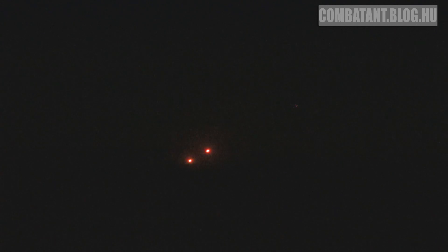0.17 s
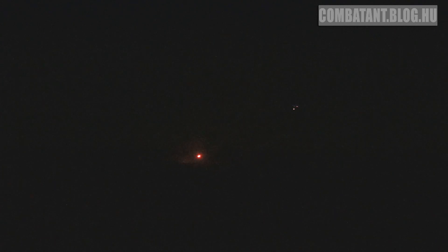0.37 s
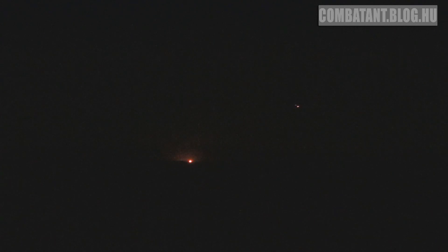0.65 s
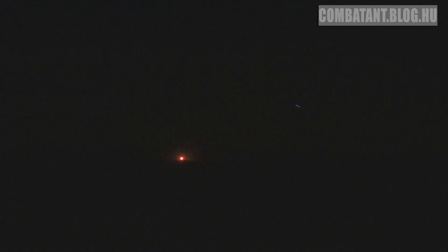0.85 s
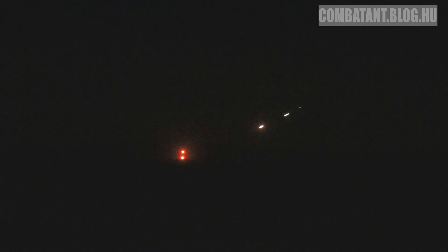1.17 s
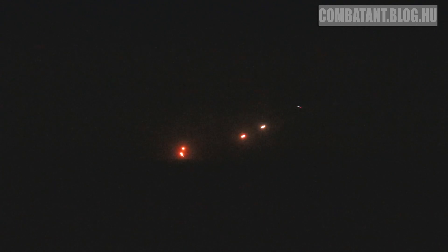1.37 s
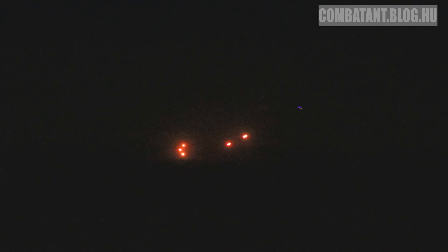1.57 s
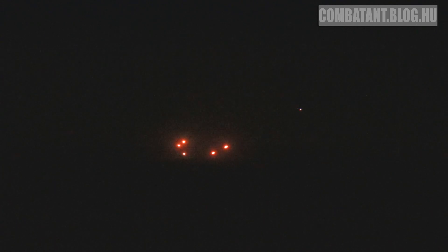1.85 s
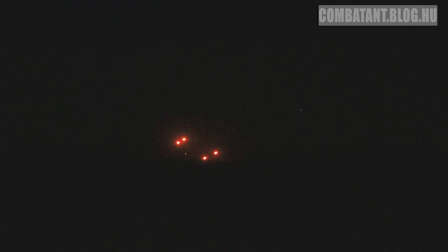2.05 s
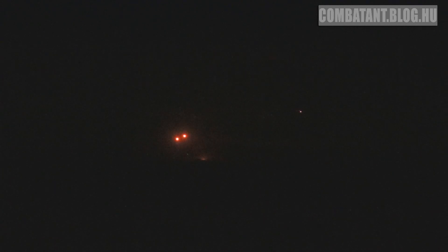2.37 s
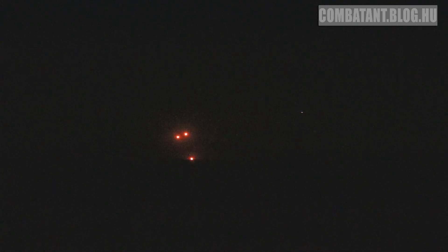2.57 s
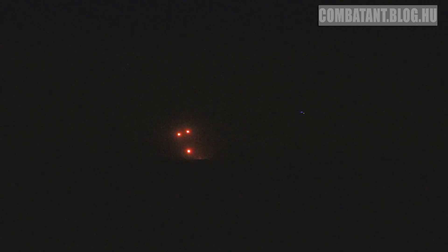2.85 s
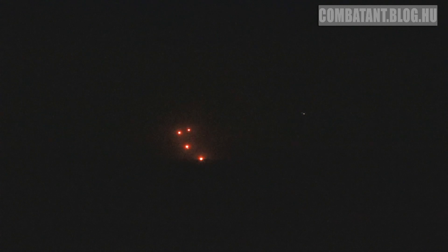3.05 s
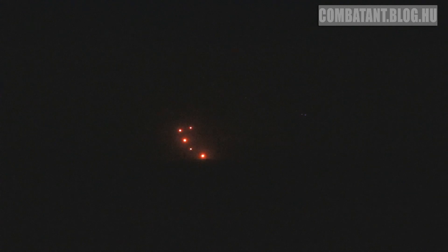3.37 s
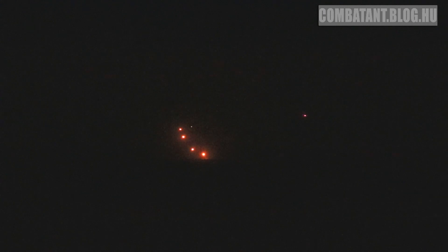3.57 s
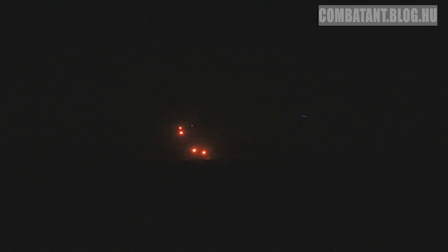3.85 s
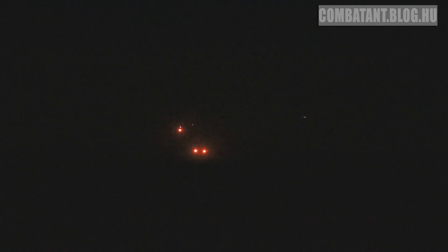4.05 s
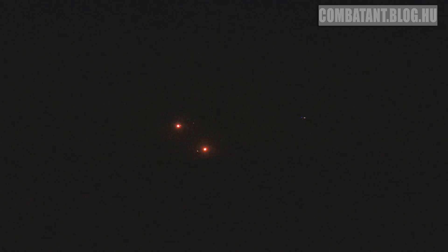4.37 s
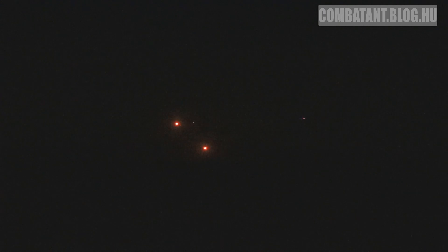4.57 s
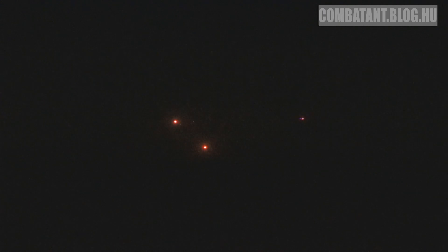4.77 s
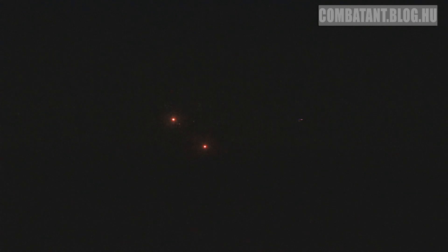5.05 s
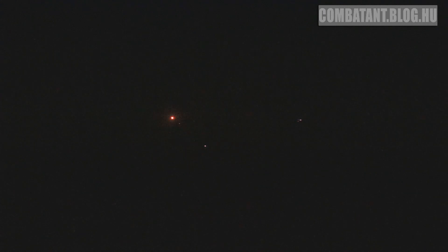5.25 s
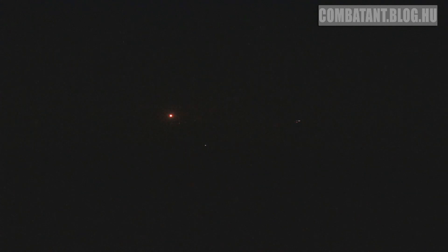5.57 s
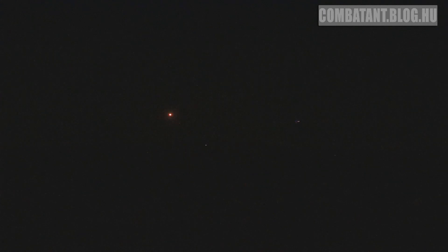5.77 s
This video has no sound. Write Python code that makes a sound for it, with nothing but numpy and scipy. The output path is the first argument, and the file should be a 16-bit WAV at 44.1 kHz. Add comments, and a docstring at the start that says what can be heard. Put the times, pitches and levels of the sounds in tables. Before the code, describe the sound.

Far-off automatic gunfire, dull, hard-edged single bangs with low thumps and murky echoes, over a quiet night rumble and microphone hiss.

```python
"""Distant cannon at night

An automatic cannon fires twelve rounds far away over open ground at night.
Each bang is a sharp front along several paths, a ringing body, a late low thump and a noisy spray.
The terrain answers with dull echoes, made by convolving each bang with shaped noise.
Under it lie a low night rumble and faint wavering tones, both made from noise, and microphone hiss."""
import sys
import numpy as np
from scipy import signal
from scipy.fft import rfft, irfft, next_fast_len
from scipy.io import wavfile

SR = 44100
rng = np.random.default_rng(int(sys.argv[2]) if len(sys.argv) > 2 else 0)


def transcribe(u):
    """Save the signal u as a 16-bit wav file named by the first command-line argument.

    u: samples, shape (n,) or (channels, n), limited to [-1, 1]; the rate is SR.
    q: integer samples, one column per channel.
    """
    v = np.clip(np.atleast_2d(u).T, -1, 1)
    q = np.round(v * 32767).astype(np.int16)
    wavfile.write(sys.argv[1], SR, q)


N = 260542  # length in samples


def from_db(db):
    """Turn decibels into a factor for the sound pressure."""
    return 10 ** (np.asarray(db) / 20)


def rms_one(x):
    """Scale to an rms (average strength) of 1."""
    return x / np.sqrt(np.mean(x ** 2) + 1e-20)


def low_pass(x, hz, order=2):
    """Weaken what lies above a frequency (Butterworth filter)."""
    sos = signal.butter(order, min(hz, 0.45 * SR), fs=SR, output="sos")
    return signal.sosfilt(sos, x + 1e-18)


def high_pass(x, hz, order=2):
    """Weaken what lies below a frequency (Butterworth filter)."""
    sos = signal.butter(order, hz, "high", fs=SR, output="sos")
    return signal.sosfilt(sos, x + 1e-18)


def colour(x, spectrum):
    """Raise or lower each frequency by a table of f/Hz, level/dB, joined up along log frequency."""
    hz, db = np.transpose(spectrum)
    size = next_fast_len(x.shape[-1])
    bins = np.maximum(np.fft.rfftfreq(size, 1 / SR), 1)
    gain = from_db(np.interp(np.log(bins), np.log(hz), db))
    return irfft(rfft(x, size) * gain, size)[..., :x.shape[-1]]


def stereo_noise(size, side_db):
    """White noise, nearly alike at two close microphones: a shared part and a weaker opposed part."""
    mid, side = rng.standard_normal((2, size))
    opposed = side * np.array([[1], [-1]])
    return rms_one(mid + from_db(side_db) * opposed)


def night_rumble():
    """The low rumble of the night: steady noise with most of its strength in the bass."""
    # colour of the rumble: f/Hz, relative level/dB
    night_colour = [(25, -21.5), (60, -10), (100, 1.5), (150, -1.5), (190, -5), (290, -1.5), (380, -7),
                    (600, -4.5), (830, -8.5), (1050, -15.5), (1280, -16), (1950, -21.5), (2400, -31),
                    (2900, -25), (3600, -48), (7000, -63)]
    rumble = colour(stereo_noise(N, side_db=-13), night_colour)
    return from_db(-51.5) * rms_one(rumble)


def drone():
    """Faint tones, as of engines far off; slow noise makes their strength and phase waver."""
    # tones: f/Hz, width/Hz, rms level/dB
    tones = [(145, 8, -61), (1349, 14, -71), (1668, 22, -71)]
    out = np.zeros(N)
    for hz, width, db in tones:
        # the first second is dropped, so the filter has settled
        waver = low_pass(rng.standard_normal((2, N + SR)), width / 2)[:, SR:]
        phase = 2 * np.pi * hz * np.arange(N) / SR
        tone = waver[0] * np.cos(phase) + waver[1] * np.sin(phase)
        out += from_db(db) * rms_one(tone)
    return out


def terrain():
    """Slopes and tree lines each return a dull copy and a smear; the last smear rolls on faintly."""
    # echoes: delay t/s, level before colouring/dB, rise t/s, fade t/s, dull above f/Hz,
    # clean copy against the smear/dB
    reflections = [(0.017, -19.5, 0.0048, 0.066, 2700, -29), (.037, -18.5, 0.0056, 0.015, 380, 2.5),
                   (.117, -22, 0.00081, 0.0049, 1420, -3), (.25, -22, 0.00049, 0.034, 740, -13),
                   (0.087, -22.5, 0.032, 0.71, 2200, -40)]
    # colour of all echoes together: f/Hz, level/dB
    echo_colour = [(50, 10.5), (140, 0), (240, 2.5), (380, 2), (520, 1.5), (800, 4.5), (1500, 4.5),
                   (2500, 4.5), (4000, 13), (8000, -25)]
    t = np.arange(int(1.6 * SR)) / SR
    response = np.zeros((2, len(t)))
    for delay, db, rise, fade, dull_hz, clean_db in reflections:
        age = np.maximum(t[t < delay + 10 * fade] - delay, 0)
        swell = (1 - np.exp(-age / rise)) ** 2 * np.exp(-age / fade)
        swell = swell / np.sqrt(np.sum(swell ** 2))
        # new noise on each call: the grain changes with the drifting air
        echo = swell * stereo_noise(len(t), side_db=-8)[:, :len(age)]
        echo[:, round(delay * SR)] += from_db(clean_db)
        response[:, :len(age)] += from_db(db) * low_pass(echo, dull_hz)
    return colour(response, echo_colour)


def spray(t, spectrum, rise_db_per_s, hold_s, fall_db_per_s):
    """Turbulence scatters a bang into weak arrivals, some ahead of the front, most behind it; rms 1."""
    # swells up to the front, holds briefly and dies away
    db = rise_db_per_s * np.minimum(t, 0) - fall_db_per_s * np.maximum(t - hold_s, 0)
    grain = colour(stereo_noise(len(t), side_db=-22.5), spectrum)
    return rms_one(from_db(db) * grain)


def packet(t, hz, delay, steep):
    """A narrow band lags in the air layer over the ground: it swells, crests at the delay and dies."""
    age = np.maximum(t, 0) / delay
    swell = (age * np.exp(1 - age)) ** steep
    return swell * np.cos(2 * np.pi * hz * (t - delay))


def front(t, air_hz, push_s, path_spread_db):
    """A pressure jump and its suction, rounded by the air, arriving along a few paths; peak 1."""
    # paths: delay t/s, relative level/dB
    paths = [(0, 12.5), (.004, 2), (.0062, -3), (.0118, -31)]
    out = np.zeros(len(t))
    for k, (delay, db) in enumerate(paths):
        # delays, and all levels but the first, vary a little by chance
        arrival = delay * (1 + 0.027 * rng.standard_normal())
        age = (t + push_s / 2 - arrival) / push_s
        blast = (age >= 0) * (1 - age) * np.exp(-np.abs(age))
        out += blast * from_db(db + (k > 0) * path_spread_db * rng.standard_normal())
    out = low_pass(low_pass(out, air_hz), 1.46 * air_hz, order=4)
    # the reflection off soft ground cancels the low part of the front
    out = high_pass(out, 280)
    return out / out.max()


def cannon():
    """Every round as it reaches the listener: front, body, thump and spray, followed by its echoes."""
    # rounds: t/s, strength/dB, front passes clearly up to f/Hz, thump against strength/dB,
    # ringing body against strength/dB
    rounds = [(1.2638, -9, 2480, -8, 0.5), (1.8046, -11.5, 1750, -8, -1), (2.2722, -10.5, 1760, -8.5, -4.5),
              (2.6466, -7.5, 2300, -18, -7), (3.0509, -9.5, 2158, -15, -1.5), (3.4864, -9, 1847, -8.5, -3),
              (3.8641, -11, 1750, -9, -5), (4.2544, -12, 1730, -6, -3), (4.4879, -11.5, 2100, -8.5, -6),
              (4.8904, -9.5, 2620, 2, -4), (5.1169, -13, 2620, 2.5, 0), (5.5375, -14.5, 1350, -3.5, -0.5)]
    # colours of the two sprays: f/Hz, relative level/dB
    dull_colour = [(25, -52), (60, -12), (130, 2.5), (240, -4), (340, 3.5), (620, -3), (780, 3), (980, -1),
                   (1200, -15), (1700, -75), (3000, -59)]
    bright_colour = [(600, -2.5), (1150, 3.5), (1700, 1), (2600, -9), (3300, -21), (4200, -31.5),
                     (5500, -64), (8000, -68)]
    usual_clear_hz = 2000
    usual_strength_db, echo_follows = -11, 0.48  # the second is a share of the dB change
    out = np.zeros((2, N))
    t = np.arange(int(-0.03 * SR), int(0.06 * SR)) / SR
    for s, strength_db, clear_hz, thump_db, body_db in rounds:
        at = round((s + t[0]) * SR) + np.arange(len(t))
        # a shot that comes through clearer has a harder front and a stronger bright spray
        octaves = np.log2(clear_hz / usual_clear_hz)
        crack = from_db(-1 + 8.5 * octaves) * front(t, clear_hz, push_s=0.00071, path_spread_db=0.5)
        thump = from_db(thump_db) * packet(t, hz=138, delay=0.0058, steep=2.26)
        body = from_db(body_db) * packet(t, hz=491, delay=0.004835, steep=2.03)
        dull = from_db(-18) * spray(
            t, dull_colour, rise_db_per_s=2000, hold_s=0.0046, fall_db_per_s=720)
        bright = from_db(-23.5 + 4.5 * octaves) * spray(
            t, bright_colour, rise_db_per_s=2400, hold_s=0.013, fall_db_per_s=894)
        # the bang has little bass below this
        blast = high_pass(crack + thump + dull + bright, 68.4)
        out[:, at] += from_db(strength_db) * (blast + body)
        # the ringing body belongs mostly to the direct path, so the echoes carry less of it
        sent = blast + from_db(-1) * body
        echoes = signal.fftconvolve(sent, terrain(), axes=1)[:, :N - at[0]]
        # the echoes travel by other paths, so they follow only part of a shot's strength
        echo_db = usual_strength_db + echo_follows * (strength_db - usual_strength_db)
        out[:, at[0]:at[0] + echoes.shape[1]] += from_db(echo_db) * echoes
    return out


def scene():
    """Bangs, their echoes, the night's low rumble and the drone, slightly to the left."""
    # the left side is louder, most in the bass: f/Hz, left minus right level/dB
    lean = [(125, 1.7), (500, .7), (2000, .2)]
    left, right = night_rumble() + drone() + cannon()
    left = colour(left, [(hz, db / 2) for hz, db in lean])
    right = colour(right, [(hz, -db / 2) for hz, db in lean])
    return np.array([left, right])


def record(dry):
    """The small microphones lose the deepest bass and add their own hiss; the top is cut."""
    # colour of the hiss: f/Hz, relative level/dB
    hiss_colour = [(2500, 2), (4500, -1), (6000, -1), (9300, -1), (10500, 1), (12000, -1), (14500, -2)]
    thin = high_pass(dry, 59, order=1)
    hiss = from_db(-59) * rms_one(colour(rng.standard_normal((2, N)), hiss_colour))
    # steep cut above 14300 Hz: 0.1 dB ripple below, 80 dB down above
    top_cut = signal.ellip(12, 0.1, 80, 14300, fs=SR, output="sos")
    return signal.sosfilt(top_cut, thin + hiss)


dry = scene()
out = record(dry)
transcribe(out)
```